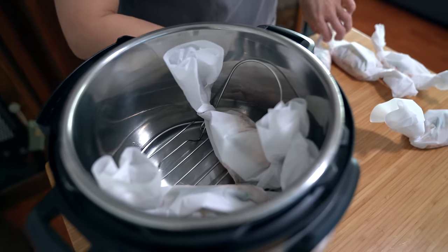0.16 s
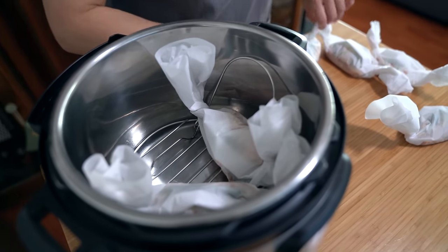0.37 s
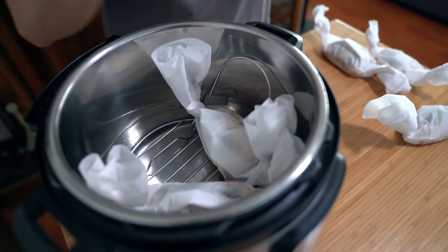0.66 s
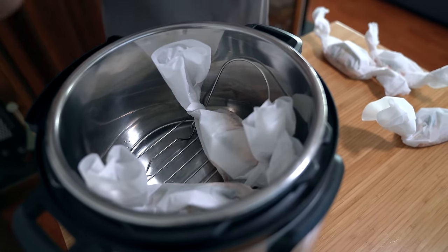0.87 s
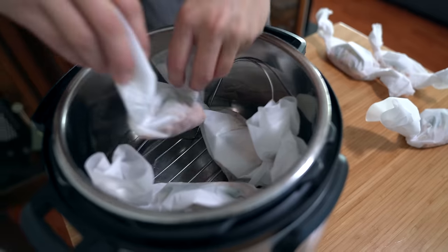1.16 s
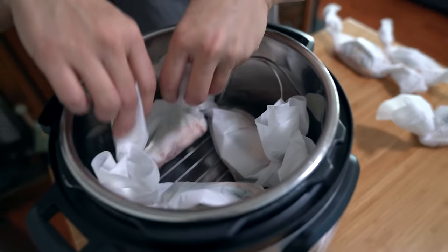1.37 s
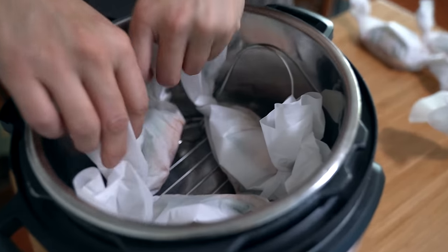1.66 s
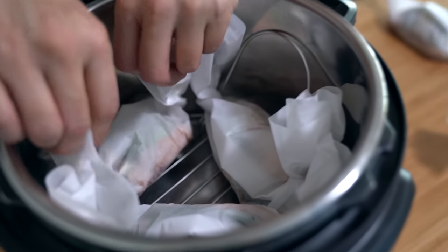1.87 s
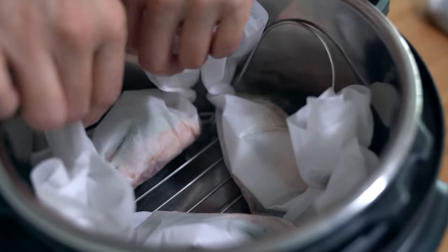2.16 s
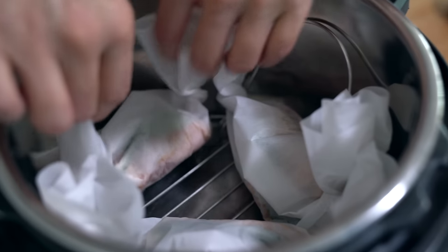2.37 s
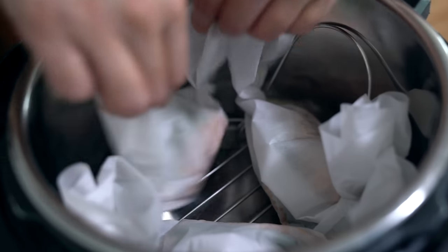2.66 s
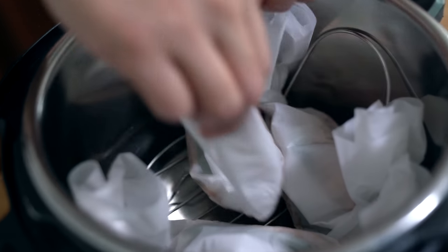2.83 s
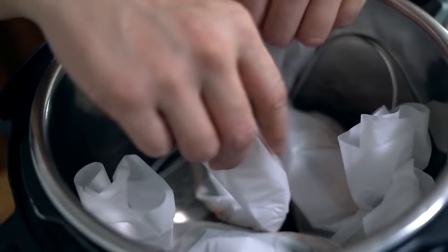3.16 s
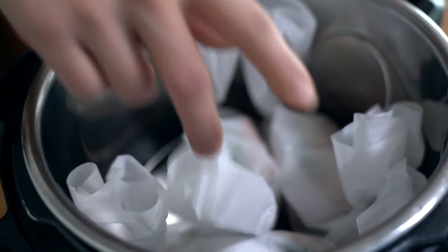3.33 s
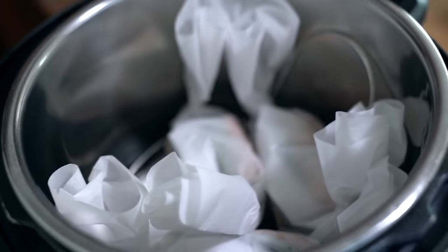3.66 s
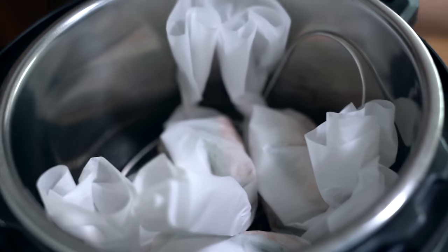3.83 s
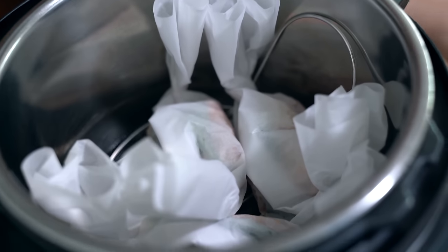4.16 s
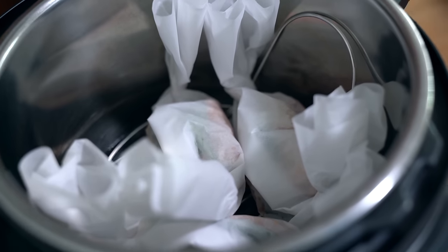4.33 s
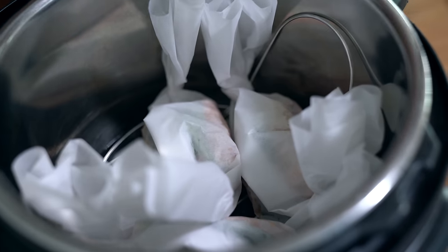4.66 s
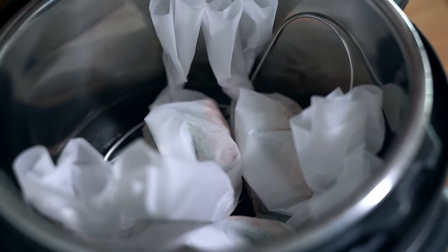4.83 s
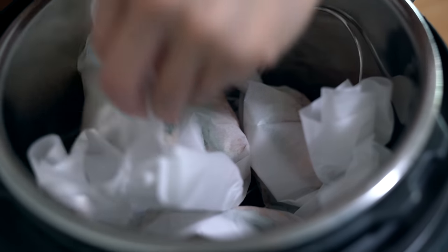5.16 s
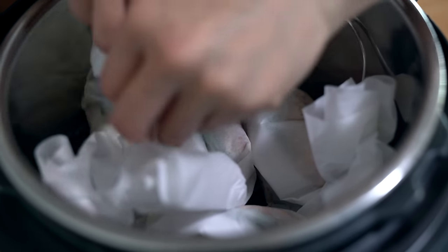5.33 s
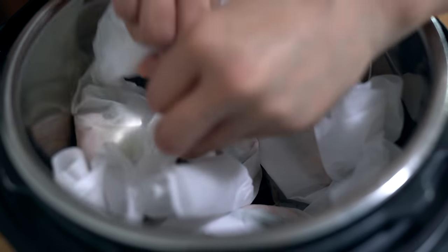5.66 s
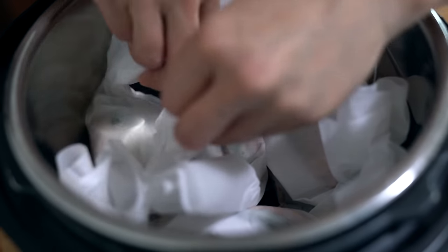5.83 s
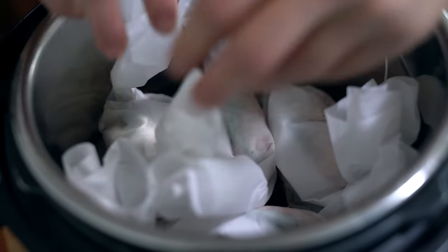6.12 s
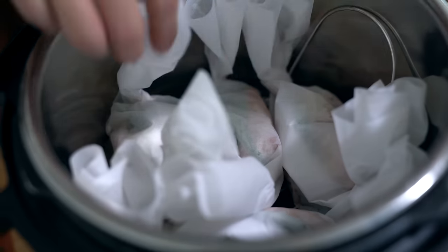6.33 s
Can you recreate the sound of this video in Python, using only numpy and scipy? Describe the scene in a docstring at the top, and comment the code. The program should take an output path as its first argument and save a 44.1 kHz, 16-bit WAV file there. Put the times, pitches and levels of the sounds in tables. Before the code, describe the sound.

Hands work stiff paper-wrapped parcels in a small kitchen: close crackling, rustling and sharp snaps. The paper soon moves into a steel pot and gains a hollow ring, with faint low thuds on the wire rack. After a near-silent pause midway, crinkling resumes, a parcel lands with a firmer thud, small knocks follow, and a last quick crackle ends it. Close single-channel pickup, short room reflections, faint low hum.

```python
"""Stiff paper crackles and snaps, with a hollow ring when it is worked inside a pot, soft thuds and a few knocks.
Hands carry paper parcels to an open steel pot and press them down on its wire rack.
Creases buckle as single noise bursts through resonances, over clumps of tiny damped rings.
The paper also drives the air of the pot, and the loaded rack thuds as a low tone with a rattle.
A small kitchen answers with decaying noise, over a faint low hum made of filtered noise."""
import sys
import numpy as np
from scipy import signal
from scipy.fft import rfft, irfft, next_fast_len
from scipy.io import wavfile

SR = 44100
rng = np.random.default_rng(int(sys.argv[2]) if len(sys.argv) > 2 else 0)


def voltage_ratio(level):
    """Linear amplitude factor for a level in decibels (scalar or array-like)."""
    return 10 ** (np.asarray(level, float) / 20)


def master_out(mix):
    """Clip the mix to full scale and print it as 16-bit PCM to the path in sys.argv[1]."""
    frames = np.transpose(np.atleast_2d(mix))
    ceiling = np.clip(frames, -1, 1)
    pcm = np.round(ceiling * 32767).astype(np.int16)
    wavfile.write(sys.argv[1], SR, pcm)


N = 286209  # length in samples, about 6.5 s

# Single creases that flip. Each row: start in seconds, peak in dB before the sheet loses its bass,
# panel pitch in Hz, gain of the crisp edge in dB, time to flip in ms.
CREASES = [(0.0974, -30, 1300, -23, 0.5), (0.2244, -16.5, 1720, -23, 0.46), (0.2693, -15.5, 2100, -10, 1),
           (0.2904, -18, 4460, -15, 0.5), (0.3197, -16.5, 3240, -13, 0.64), (0.3476, -8.5, 2050, -21, 0.17),
           (0.3865, -12, 1760, -31, 0.5), (0.4174, -27, 3400, -23, 0.57), (0.4904, -23, 1490, -23, 0.59),
           (0.5541, -17, 1360, -24, 0.52), (0.5934, -21, 1200, -18, 0.39), (0.6355, -21, 1730, -10, 0.76),
           (0.6509, -10.5, 3400, -25, 0.5), (0.7637, -20.5, 1960, -31, 0.78),
           (0.7836, -10, 3600, -40, 0.44), (0.8121, -22, 5500, -21, 0.72), (0.8535, -21, 2690, -32, 0.4),
           (0.8719, -30, 4350, -33, 0.67), (0.9707, -19, 3170, -27, 0.79), (1.0136, -20, 2350, -26, 0.75),
           (1.0405, -14, 2760, -33, 0.5), (1.0615, -16.5, 2400, -12, 0.74), (1.0864, -20, 6300, -23, 0.5),
           (1.1124, -19.5, 5310, -22, 0.59), (1.1254, -20, 1230, -30, 0.52), (1.1508, -22, 5300, -21, 0.62),
           (1.1757, -20.5, 3400, -8, 0.5), (1.2401, -15.5, 1540, -27, 0.76),
           (1.2634, -14.5, 1470, -28, 0.21), (1.2834, -11, 2000, -24, 0.42),
           (1.3628, -15.5, 2050, -21, 0.69), (1.4491, -17.5, 3580, -12, 0.84), (1.49, -15, 1870, -14, 0.44),
           (1.5724, -16, 2790, -2, 0.5), (1.6447, -19, 1950, -17, 0.5), (1.6706, -7.5, 2730, -15, 0.36),
           (1.7144, -13.5, 2830, -17, 0.26), (1.7569, -13, 1440, -16, 0.6), (1.8243, -15, 2300, -23, 0.5),
           (1.8367, -22, 3000, -20, 0.39), (1.8582, -11, 5500, -31, 0.37), (1.9305, -13.5, 1610, -12, 0.78),
           (2.0138, -12.5, 5400, -18, 0.5), (2.0787, -15.5, 5200, -27, 0.57),
           (2.2019, -21, 5500, -13, 0.76), (2.2657, -19, 5270, -18, 1), (2.3715, -12, 2850, -12, 0.5),
           (2.4239, -18.5, 5310, -8, 0.42), (2.4488, -17, 3270, -26, 0.77),
           (2.4723, -17.5, 6020, -22, 0.54), (2.5476, -23, 6360, -22, 1), (2.5576, -13.5, 2900, -25, 0.5),
           (2.5915, -11.5, 5600, -21, 0.67), (2.6803, -9.5, 5200, -6.5, 0.98),
           (2.7392, -19.5, 5900, -4, 0.66), (2.795, -11.5, 6070, -7, 0.5), (2.8739, -21, 6450, -18, 0.71),
           (2.8868, -20.5, 1450, -26, 0.39), (2.9332, -20, 3100, -23, 0.38), (2.9771, -22, 2150, -15, 0.37),
           (3.0086, -14, 2920, -2.5, 0.78), (3.056, -19, 3200, -3, 1), (3.0909, -18.5, 2810, -10, 0.81),
           (3.1368, -18.5, 2380, -11, 0.63), (3.1946, -22, 5740, -21, 0.76), (3.245, -20, 2470, -7, 0.92),
           (3.2725, -14.5, 6200, -25, 0.7), (3.3084, -20, 6030, -12, 0.65),
           (3.3458, -13.5, 5250, -19, 0.62), (3.4166, -24, 2890, -11, 0.63), (3.4331, -19, 3000, -12, 0.77),
           (3.5099, -15.5, 6600, -27, 0.88), (4.0562, -23, 2290, -6, 0.84),
           (4.0836, -16.5, 1220, -29, 0.73), (4.157, -12, 4520, -26, 0.35), (4.1759, -9.5, 4830, -18, 0.79),
           (4.2757, -17, 1220, -13, 0.56), (4.3034, -18, 1960, -26, 0.26), (4.37, -13.5, 2630, -6, 0.44),
           (4.3944, -30, 2620, -19, 0.55), (4.6004, -26.5, 1230, -10, 0.58), (4.6084, -19, 5800, -17, 0.5),
           (4.6553, -25, 2700, -19, 0.4), (4.6708, -15, 2530, -15, 0.74), (4.7308, -14.5, 3340, -22, 0.42),
           (4.7366, -10, 2320, -25, 1), (4.7691, -18, 3030, -22, 0.72), (4.786, -18, 3350, -19, 0.42),
           (4.807, -17, 2650, -20, 0.44), (4.8609, -18, 2750, -31, 0.41), (4.8813, -20.5, 5820, -13, 0.55),
           (4.9064, -30, 3150, -17, 0.41), (4.9202, -16, 1280, -14, 0.44), (4.9566, -9.5, 2600, -24, 0.5),
           (4.9644, -13, 6400, -20, 0.71), (4.998, -21.5, 2850, -9, 0.62), (5.0265, -13, 2460, -10, 0.5),
           (5.0914, -19.5, 6540, -16, 0.62), (5.1377, -18, 1750, -11, 0.33),
           (5.1474, -18.5, 1340, -16, 0.4), (5.227, -5.5, 2270, -20, 0.27), (5.2694, -21.5, 6870, -14, 0.5),
           (5.3413, -23, 5910, -23, 0.3), (5.3464, -16.5, 4270, -23, 0.5), (5.4181, -15.5, 6960, -18, 0.77),
           (5.5199, -16, 5640, -8, 0.72), (5.6725, -27, 5400, -18, 0.62), (5.7244, -4, 3660, -11, 0.68),
           (5.9209, -14, 3350, -62, 0.98), (6.0072, -13, 2130, -22, 0.44), (6.0462, -11, 3200, -14, 0.34),
           (6.0637, -14.5, 1400, -13, 0.5), (6.0851, -12, 6300, -28, 0.45), (6.1838, -16, 6030, -22, 0.65),
           (6.3515, -18, 2350, -29, 0.75), (6.455, -17.5, 3180, -17, 1)]
# Weight landing on the rack. Each row: start in seconds, level in dB before rise and decay, ring in Hz.
LANDINGS = [(0.017, -31, 224), (0.386, -55, 243), (1.296, -46, 204), (1.357, -40, 161), (1.607, -43, 204),
            (1.793, -42, 200), (2.098, -44, 175), (2.291, -50, 158), (5.072, -39.5, 166), (5.221, -37, 262),
            (5.746, -26.5, 159), (5.92, -47, 260), (6.001, -41.5, 209)]
# Colour of the paper's crackle. Each row: pitch in Hz, relative level in dB.
PAPER_COLOUR = [(150, -20), (300, -15), (480, 25), (1000, 17), (1600, 13.5), (2700, 13), (4300, 8),
                (6000, 8), (9000, 1.5), (13000, -10.5), (16500, -18)]
# Resonances of the air and floor of the pot. Each row: pitch in Hz, width in Hz, gain in dB.
POT_MODES = [(159, 32, 10), (415.5, 43, 13), (920, 77, 7.5), (1444, 110, -3.5), (5770, 900, -3.5)]
# How much of the work is done inside the pot. Each row: time in seconds, share from 0 to 1.
SHARE_INSIDE = [(0, 0.), (1.15, 0.12), (1.25, 0.66), (3.55, 0.61), (3.7, 0.14), (5.05, 0), (5.15, 0.9),
                (6.49, 0.27)]
# Colour of the kitchen air. Each row: pitch in Hz, relative level in dB.
AIR_COLOUR = [(25, -10.5), (55, -5.5), (100, -2.5), (210, 1), (450, -6), (700, -2.5), (2000, -24.5),
              (4400, -27), (9000, -27.5), (16000, -39)]
# How long the kitchen rings. Each row: pitch in Hz, time to fall by 60 dB in seconds.
KITCHEN_DECAY = [(200, 0.31), (1500, 0.14), (10000, 0.18)]
# Steady handling. Each row: time in seconds, crumpling drive in dB, body of the sheet in dB
# (in full below 750 Hz, none above 1500 Hz), crispness in dB per octave above 4000 Hz.
STEADY_GRIP = [(0, -34.5, 0.5, -2.5), (.34, -38.5, 5, -2), (.6, -36.5, -2.5, -2.5), (.76, -41, -6, -10),
               (.95, -35, -8, -10), (1.18, -39.5, 0.5, -0.5), (1.53, -29.5, 2, -0.5),
               (1.75, -31, -0.5, -0.5), (2.2, -39.5, 0, -2), (2.38, -34.5, -0.5, -1), (2.53, -42, 3.5, 0),
               (2.85, -36.5, -1, -3), (3.33, -38.5, -4.5, -0.5), (3.62, -61.5, -4.5, -6),
               (3.8, -57, 9, -10), (3.97, -56.5, 12.5, -5), (3.998, -37.5, 5.5, 1), (4.15, -44, -6.5, -2),
               (4.4, -41.5, -6, 0.5), (4.52, -40.5, -2.5, -2.5), (4.8, -37.5, -13, -5.5),
               (5.17, -35, -8, 0), (5.5, -42, 5.5, 0), (6.0, -33.5, 7, 0), (6.3, -70, 6.5, -13),
               (6.49, -84, -4, 2)]
# Fingers squeeze a parcel. Each row: peak time in seconds, crumpling drive in dB,
# rise in ms per 10 dB (sign ignored), fall in ms per 10 dB, extra body in dB.
FINGER_SQUEEZES = [(.066, -28, 60, 65, 2.5), (.281, -29, 55, 22, -10.5), (0.394, -26.5, 52, 56, -5.5),
                   (.649, -26.5, 31, 39, 3), (1.272, -23.5, 56, 27, 3.5), (1.363, -33.5, 17, 33, 7),
                   (1.68, -27, 24, 50, -9), (1.85, -26, 39, 59, 4), (2.03, -30, 43, 101, -13),
                   (2.298, -29.5, 22, 40, 1.5), (2.585, -26.5, 19, 47, -4.5), (2.686, -30.5, 34, 25, -6.5),
                   (2.792, -26, 73, 38, 0), (3.199, -32.5, 12, 43, 7), (3.28, -33, 11, 55, 7),
                   (3.436, -36, 38, 24, 1), (3.514, -37, 8, 11, 0), (3.579, -42, 16, 20, 9),
                   (4.101, -29.5, 11, 68, 8.5), (4.186, -26.5, 16, 51, 8.5), (4.284, -27.5, 29, 52, 5.5),
                   (4.405, -25, 52, 36, 0.5), (4.745, -28.5, 77, 29, 2), (4.963, -38, 30, 30, -21),
                   (5.037, -27.5, 31, 39, 11.5), (5.146, -28.5, 14, 37, 5), (5.232, -27, 39, 35, 12.5),
                   (5.352, -32, 6, 52, -9), (5.467, -31.5, 28, 25, -11), (5.543, -24.5, 23, 45, -8.5),
                   (5.68, -26.5, 35, 40, -5.5), (5.733, -22.5, 38, 86, -3.5), (6.054, -33, 81, 128, -5.5),
                   (6.357, -35.5, -1, 5, 14), (6.437, -21, 8.5, 7, 5.5), (6.46, -27.5, 13, 19, 10)]
# Hollow knocks, perhaps a wire of the rack against the pot. Each row: start in seconds,
# level in dB before rise and decay.
WIRE_KNOCKS = [(5.419, -18.5), (5.445, -28), (5.457, -22), (5.606, -22)]


def along(points, hz):
    """Reads a table of (Hz, value) at any pitch, on a log axis."""
    f, v = np.transpose(points)
    return np.interp(np.log(hz + 1), np.log(f + 1), v)


def filtered(x, response):
    """Multiplies the spectrum of x by a complex response to frequency."""
    m = next_fast_len(x.shape[-1] + 8192)  # spare room for the ringing
    spectrum = rfft(x, m) * response(np.fft.rfftfreq(m, 1 / SR))
    return irfft(spectrum, m)[..., :x.shape[-1]]


def mode(f, hz, width):
    """A resonance that rings only after it is struck, with a peak gain of 1."""
    return 1j * f * width / (hz * hz - f * f + 1j * f * width)


def hands(s):
    """Crumpling, body and crispness at times s: squeezes swell out of the steady grip and die back."""
    when, *columns = np.transpose(STEADY_GRIP)
    t = np.arange(0, N / SR + .1, .002)
    grip_db, body_db, crisp_db = (np.interp(t, when, c) for c in columns)
    peak_s, db, rise_ms, fall_ms, extra_db = np.transpose(FINGER_SQUEEZES)[..., None]
    late_ms = 1000 * (t - peak_s)
    drop = np.maximum(-late_ms / np.abs(rise_ms), late_ms / np.abs(fall_ms))  # in steps of 10 dB
    swell = voltage_ratio(db - 10 * drop) ** 2
    power = voltage_ratio(grip_db) ** 2 + swell.sum(0)
    effort_db = 10 * np.log10(power)
    body_db = body_db + (extra_db * swell).sum(0) / power
    return [np.interp(s, t, c) for c in (effort_db, body_db, crisp_db)]


def crackle(starts, clump_db, spread, cycles, scatter_db, panel_db, count):
    """Clumps of count tiny damped rings, raised or lowered by panel_db near their panel's pitch."""
    panel_hz = 500 * 16 ** rng.random((len(starts), 1))
    u = rng.random((len(starts), count, 3))
    s = starts[:, None] - spread * np.log(1 - u[..., 0])  # mean delay is spread, in seconds
    hz = 200 * 80 ** np.sqrt(u[..., 1])
    effort_db, body_db, crisp_db = hands(s)
    low = np.clip(np.log2(1500 / hz), 0, 1)  # share of the pitch that belongs to the body
    high = np.clip(np.log2(hz / 4000), 0, 1.6)  # octaves into the crisp range
    db = effort_db + low * body_db + high * crisp_db
    db += clump_db[:, None] + along(PAPER_COLOUR, hz)
    db -= scatter_db * np.log(1.01 - u[..., 2])  # a few rings come out somewhat louder
    db += panel_db * np.exp(-(np.log2(hz / panel_hz) / 1.2) ** 2)
    size = voltage_ratio(db) * hz / 3000 / np.sqrt(np.log(hz / 150))  # short, sparse high rings are louder

    ticks = np.arange(128)
    turns = hz.reshape(-1, 1) * ticks / SR  # cycles since the ring began
    envelope = np.exp(-turns / cycles) * np.tanh(turns)
    fade = np.cos(np.linspace(0, np.pi / 2, 128))
    rings = size.reshape(-1, 1) * np.sin(2 * np.pi * turns) * envelope * fade
    where = (s.reshape(-1, 1) * SR).astype(int) + ticks
    return np.bincount(where.ravel(), rings.ravel(), N + SR)[:N]


def rustle():
    """A dense bed of fibres sliding, under clumps where a fold gives way in stages."""
    bed_starts = rng.random(30000) * N / SR
    bed = crackle(bed_starts, np.full(30000, -6.5), spread=.002, cycles=6.0,
                  scatter_db=0.78, panel_db=-2.5, count=1)
    u = rng.random((420, 2))
    fold_starts = u[:, 0] * N / SR
    fold_db = -13 - 2.0 * np.log(1.02 - u[:, 1])
    folds = crackle(fold_starts, fold_db, spread=.004, cycles=6,
                    scatter_db=1.0, panel_db=7.0, count=20)
    return bed + folds


def lesser_creases(count):
    """Rows like CREASES at random moments, as strong as the hands are busy."""
    edge_db, flip_ms = -7, 0.29
    u = rng.random((count, 3))
    s = u[:, 0] * N / SR
    peak_db = hands(s)[0] + 10.5 + 6 * u[:, 1]
    panel_hz = 1200 * 6 ** u[:, 2]
    return [(a, db, hz, edge_db, flip_ms) for a, db, hz in zip(s, peak_db, panel_hz)]


def snaps():
    """A crease flips: a burst of noise shakes a panel of the sheet, its body and its edge."""
    out, t = np.zeros(N + SR), np.arange(2048) / SR
    rows = CREASES + lesser_creases(count=40)
    bodies_db = hands([r[0] for r in rows])[1]
    for (s, db, hz, edge_db, flip_ms), body_db in zip(rows, bodies_db):
        age = 1000 * t / flip_ms
        flip = age * np.exp(-age)
        tail = 0.16 * np.tanh(age) * voltage_ratio(-60 * t / 0.06)
        burst = rng.standard_normal(len(t)) * (flip + tail)

        def sheet(f):
            panel = mode(f, hz, .15 * hz)
            broad = 0.32 * mode(f, 3350, 5950) ** 2
            body = voltage_ratio(-2.5 + 0.41 * body_db) * mode(f, 604, 880) ** 2  # partly follows the handling
            edge = voltage_ratio(edge_db) * mode(f, 9440, 7800) ** 2
            return panel + broad - body - edge

        snap = filtered(burst, sheet)
        out[round(s * SR):][:len(t)] += voltage_ratio(db) * snap / np.abs(snap).max()
    return out[:N]


def pot(paper):
    """What crackles below the rim also drives the resonances of the vessel."""
    s, share = np.transpose(SHARE_INSIDE)
    inside = paper * np.clip(np.interp(np.arange(N) / SR, s, share), 0, 1)
    return filtered(inside, lambda f: sum(voltage_ratio(db) * mode(f, hz, width) for hz, width, db in POT_MODES))


def rack():
    """Soft weight sets the rack and pot floor ringing low and unevenly: a tone with a noisy rattle."""
    rise_s, t60_s = 0.012, 0.14
    out, t = np.zeros(N + SR), np.arange(SR // 4) / SR
    for s, db, hz in LANDINGS:
        rattle = filtered(rng.standard_normal(len(t)), lambda f: mode(f, hz, 0.72 * hz) ** 2)
        ring = np.sin(2 * np.pi * hz * t) + .35 * rattle / rattle.std()
        envelope = voltage_ratio(db - 60 * t / t60_s) * (1 - np.exp(-t / rise_s))
        out[round(s * SR):][:len(t)] += envelope * ring
    return out[:N]


def knocks():
    """Each knock is a short hollow ring: one tone that starts fast and dies away."""
    ring_hz, rise_s, t60_s = 880, 0.0007, 0.034
    out, t = np.zeros(N + SR), np.arange(SR // 8) / SR
    for s, db in WIRE_KNOCKS:
        envelope = voltage_ratio(db - 60 * t / t60_s) * (1 - np.exp(-t / rise_s))
        out[round(s * SR):][:len(t)] += envelope * np.sin(2 * np.pi * ring_hz * t)
    return out[:N]


def kitchen(x):
    """Diffuse answer of the walls: decaying noise, drawn anew for every third of a second."""
    out, step = np.zeros(N + 2 * SR), SR // 3
    for i in range(0, N, step):
        hz, t, z = signal.stft(rng.standard_normal(step), SR, nperseg=256)
        decay = voltage_ratio(-60 * t / along(KITCHEN_DECAY, hz)[:, None])
        tail = signal.istft(z * decay, SR, nperseg=256)[1]
        wet = signal.fftconvolve(x[i:i + step], tail / np.linalg.norm(tail))
        out[i + 150:][:len(wet)] += wet  # the nearest surface answers after about 3 ms
    return out[:N]


def hum():
    """Steady air and appliances far off: noise coloured towards the bass."""
    air = filtered(rng.standard_normal(N), lambda f: voltage_ratio(along(AIR_COLOUR, f)))
    return voltage_ratio(-57.5) * air / air.std()


def scene():
    """Paper, pot, rack and knocks in the kitchen; a light sheet radiates little bass."""
    paper = filtered(rustle() + snaps(), lambda f: (1j * f / (220 + 1j * f)) ** 3)
    near = paper + pot(paper) + rack() + knocks()
    mix = near + voltage_ratio(-9) * kitchen(near) + hum()
    return mix[None]  # one channel


def roll_off(x):
    """The treble ends steeply here."""
    return signal.sosfilt(signal.butter(12, 16680, fs=SR, output="sos"), x)


def record(dry):
    """Rounds off the highest peaks, then makes everything above 15850 Hz much weaker."""
    rounded = dry / (1 + np.abs(dry / .44) ** 4) ** (1 / 4)
    finished = filtered(rounded, lambda f: 1 - .95 * (f > 15850))
    return roll_off(finished)


dry = scene()
out = record(dry)
master_out(out)
```